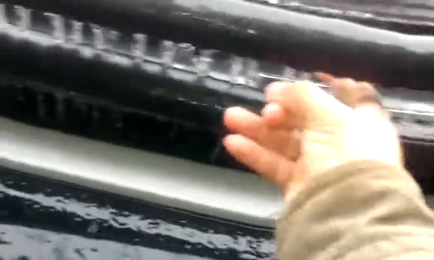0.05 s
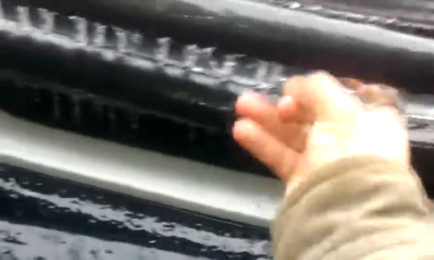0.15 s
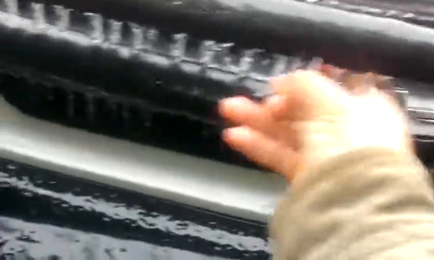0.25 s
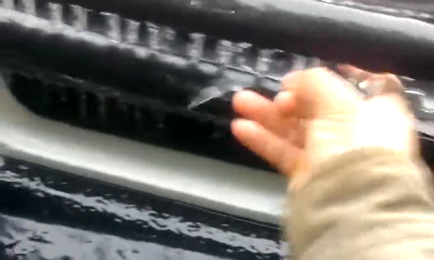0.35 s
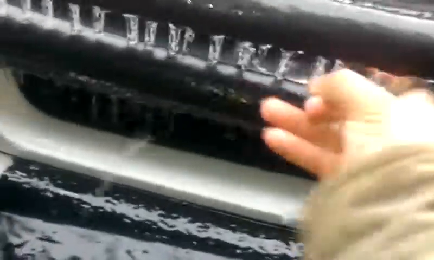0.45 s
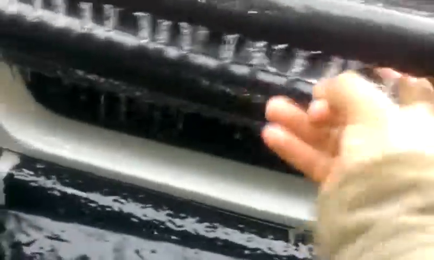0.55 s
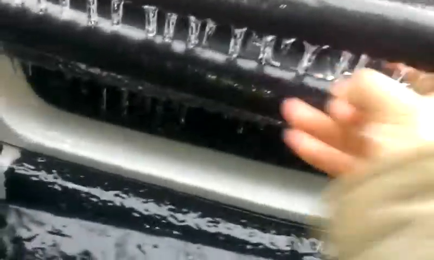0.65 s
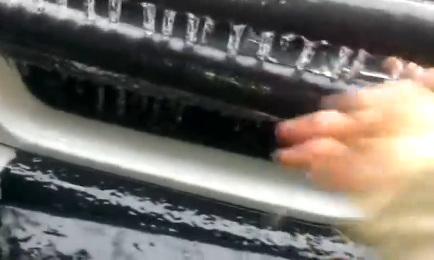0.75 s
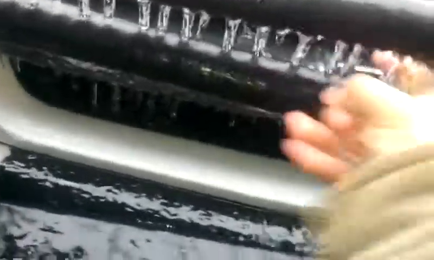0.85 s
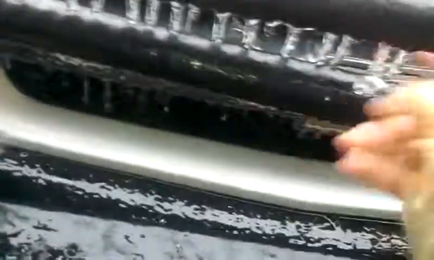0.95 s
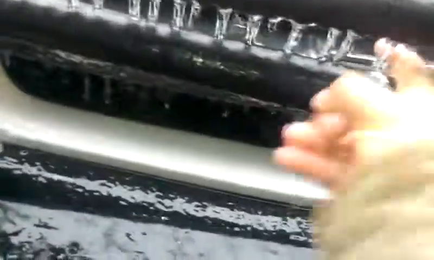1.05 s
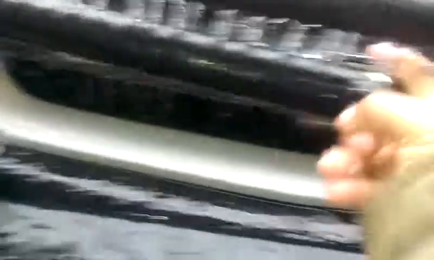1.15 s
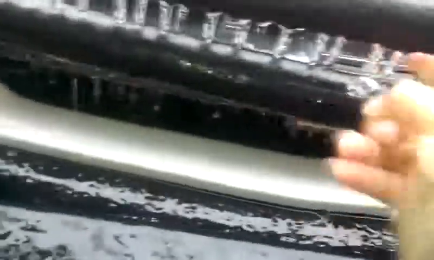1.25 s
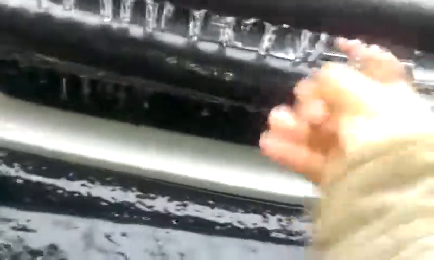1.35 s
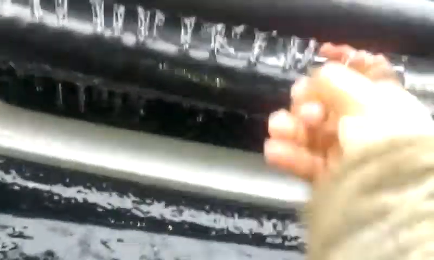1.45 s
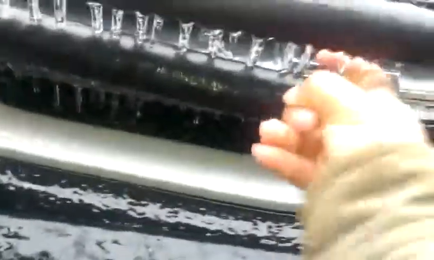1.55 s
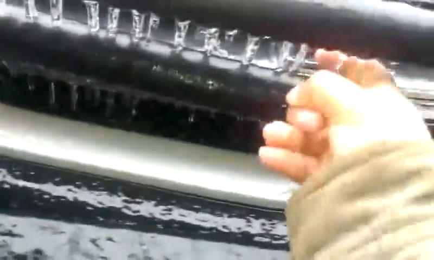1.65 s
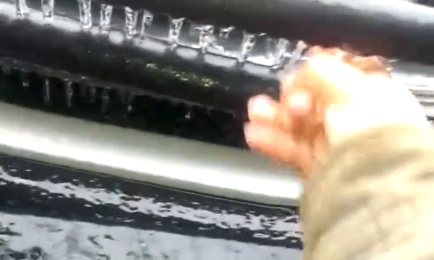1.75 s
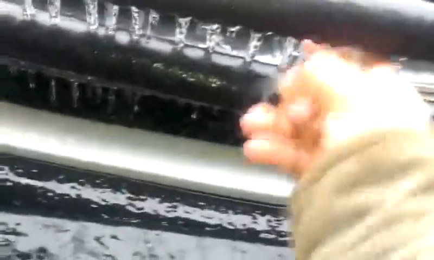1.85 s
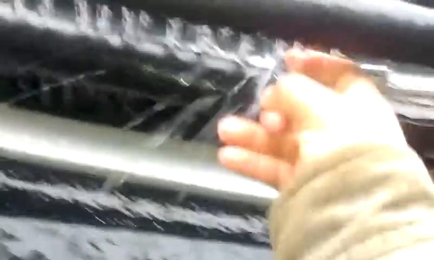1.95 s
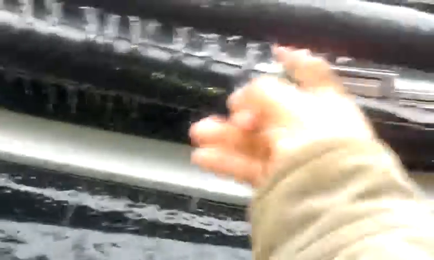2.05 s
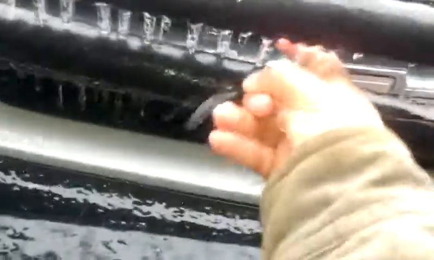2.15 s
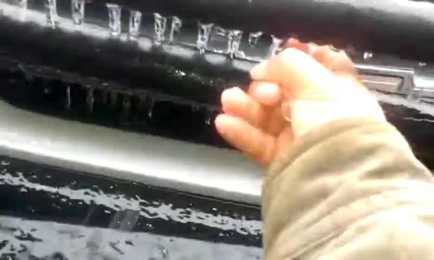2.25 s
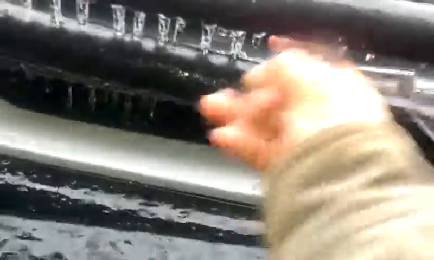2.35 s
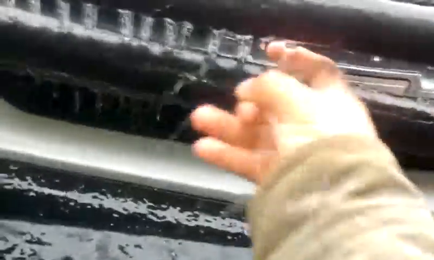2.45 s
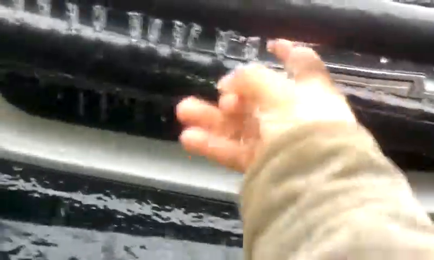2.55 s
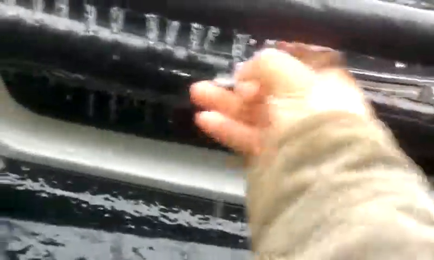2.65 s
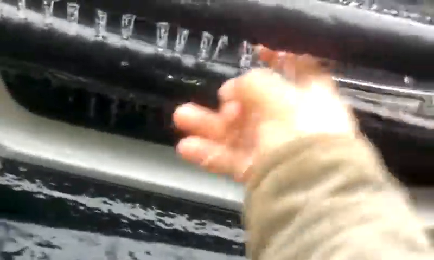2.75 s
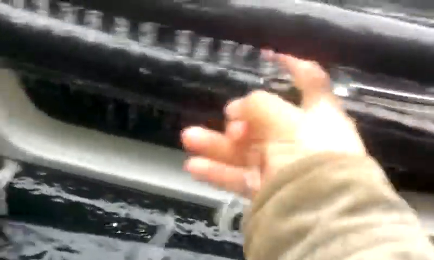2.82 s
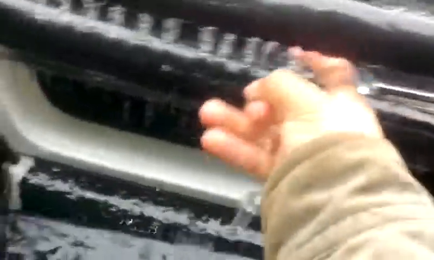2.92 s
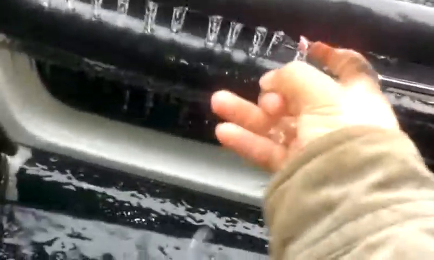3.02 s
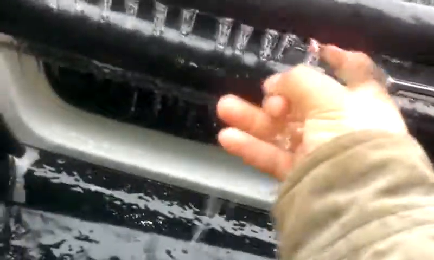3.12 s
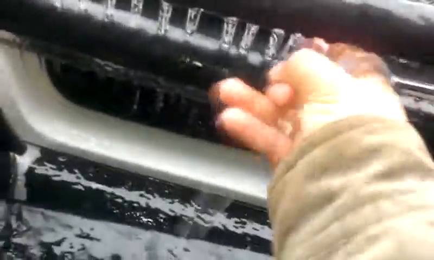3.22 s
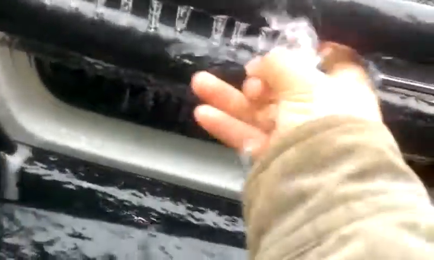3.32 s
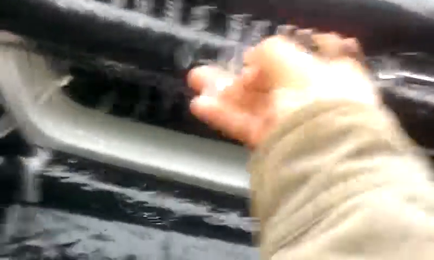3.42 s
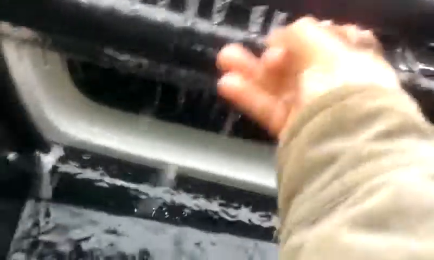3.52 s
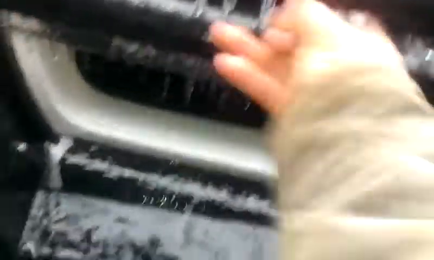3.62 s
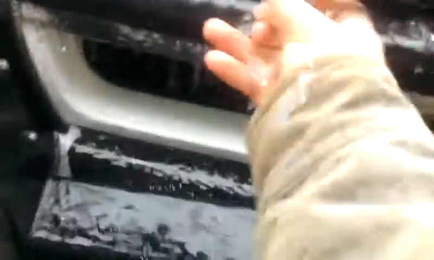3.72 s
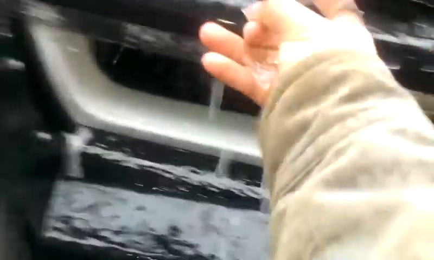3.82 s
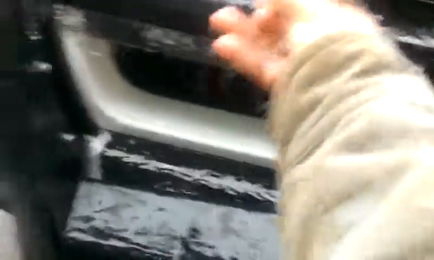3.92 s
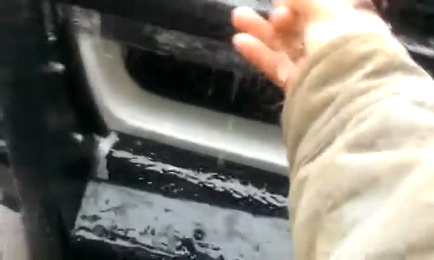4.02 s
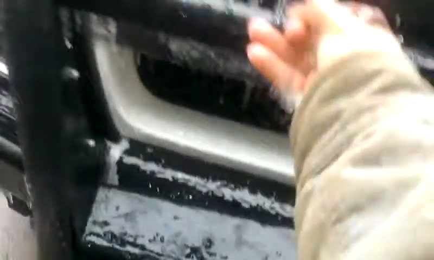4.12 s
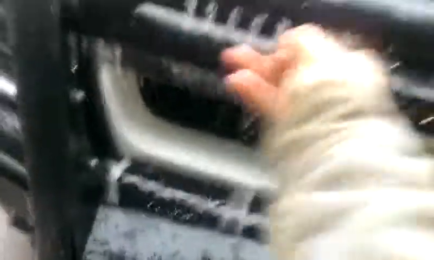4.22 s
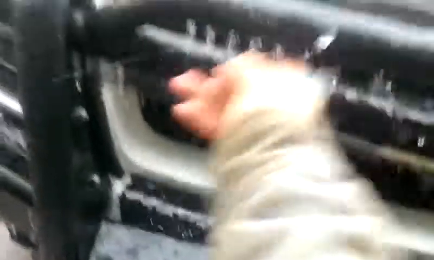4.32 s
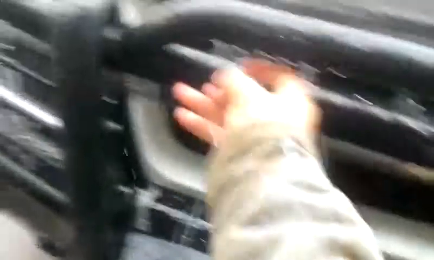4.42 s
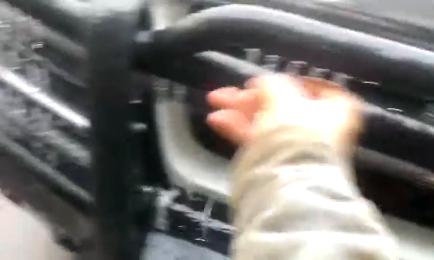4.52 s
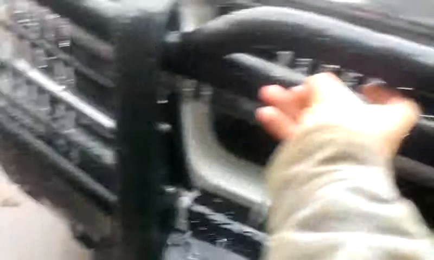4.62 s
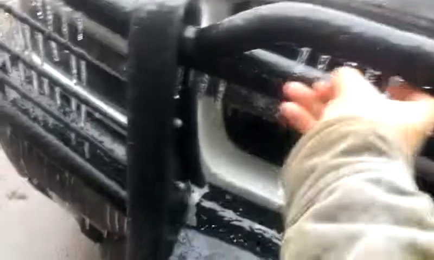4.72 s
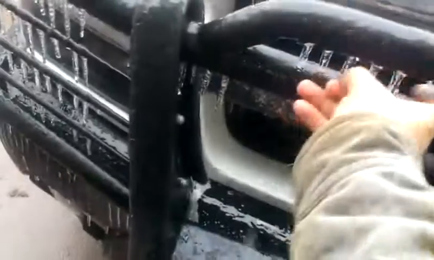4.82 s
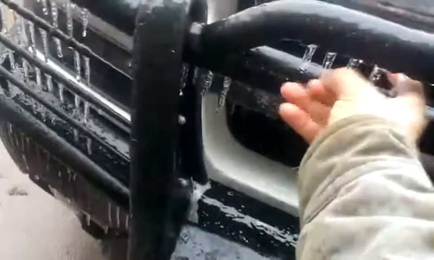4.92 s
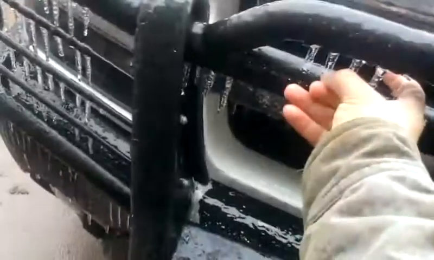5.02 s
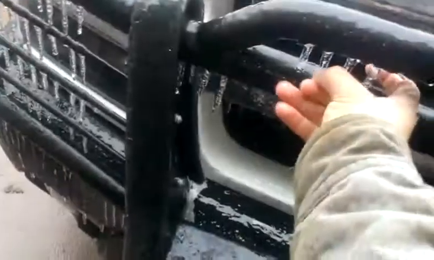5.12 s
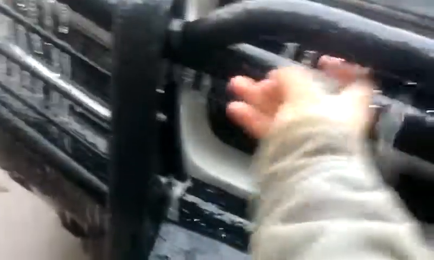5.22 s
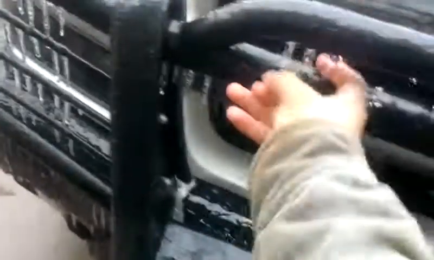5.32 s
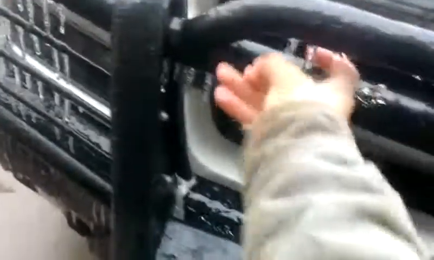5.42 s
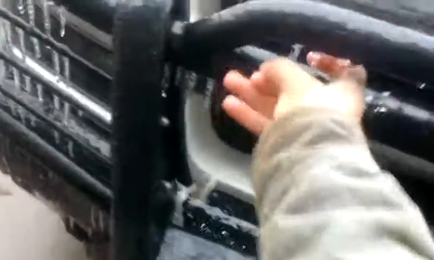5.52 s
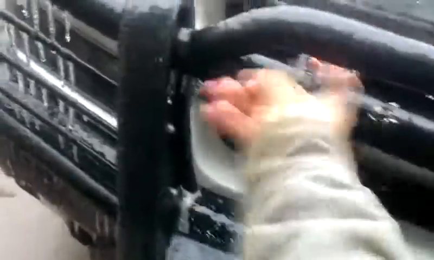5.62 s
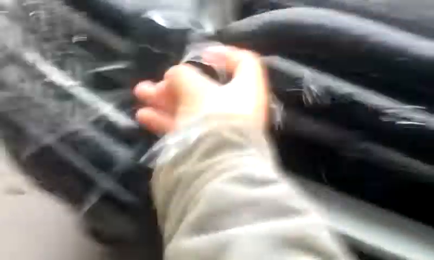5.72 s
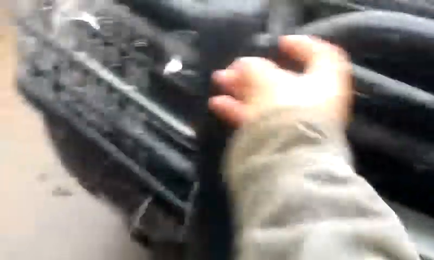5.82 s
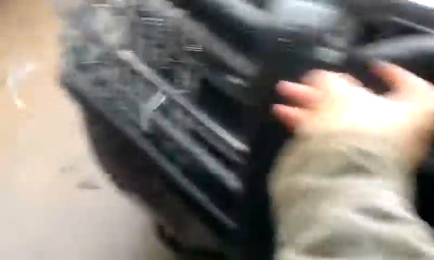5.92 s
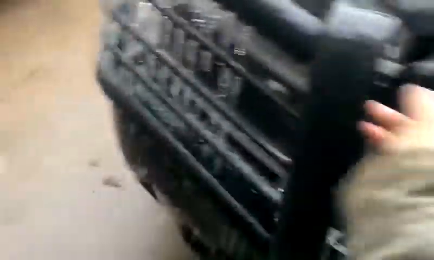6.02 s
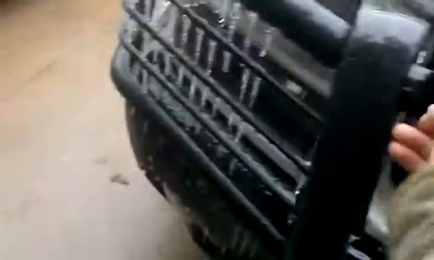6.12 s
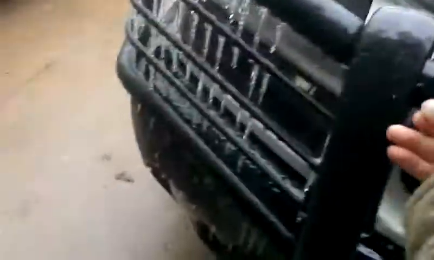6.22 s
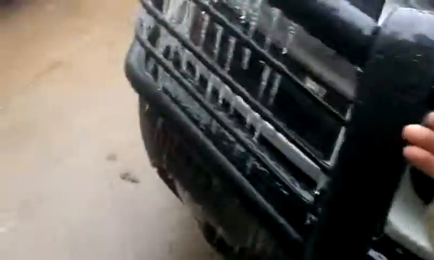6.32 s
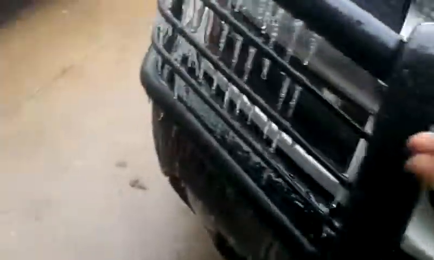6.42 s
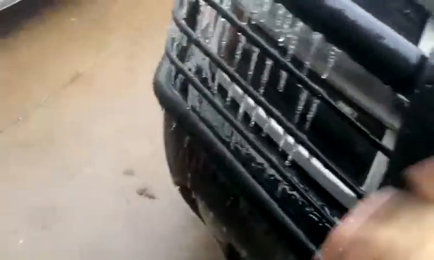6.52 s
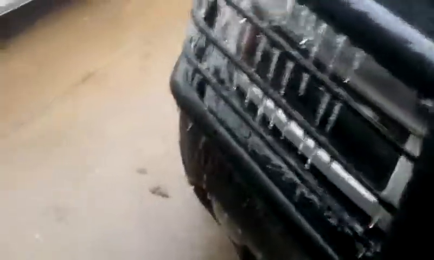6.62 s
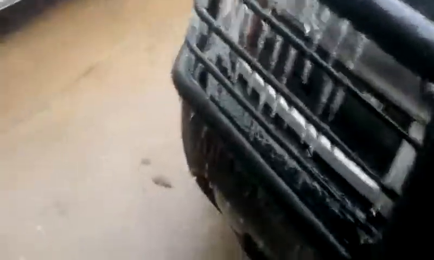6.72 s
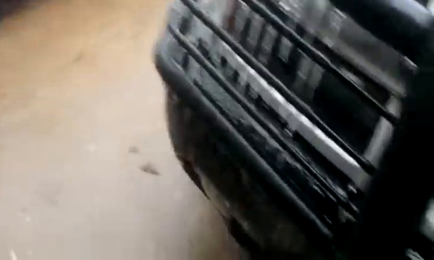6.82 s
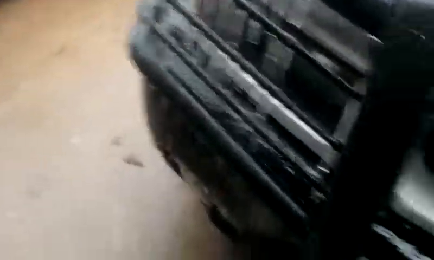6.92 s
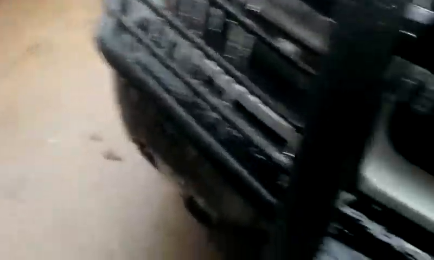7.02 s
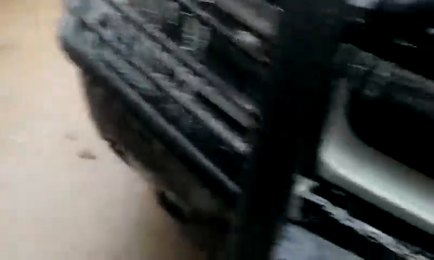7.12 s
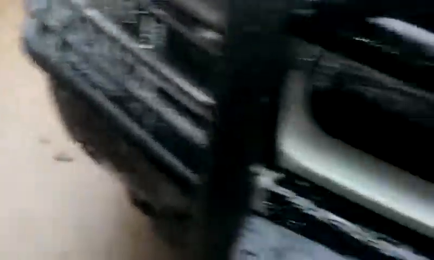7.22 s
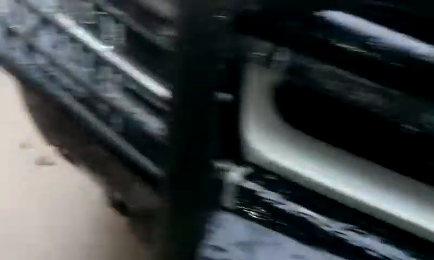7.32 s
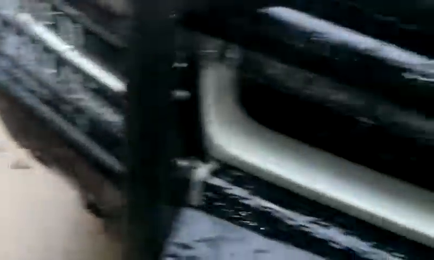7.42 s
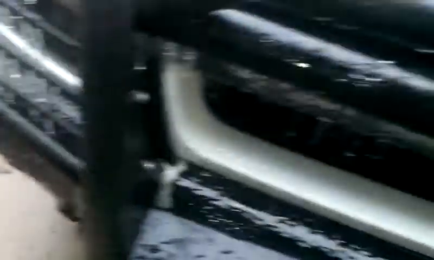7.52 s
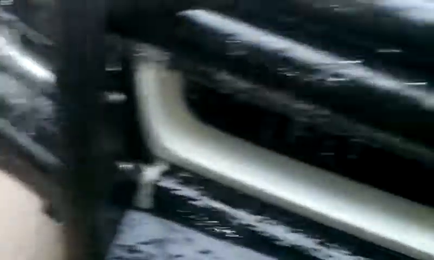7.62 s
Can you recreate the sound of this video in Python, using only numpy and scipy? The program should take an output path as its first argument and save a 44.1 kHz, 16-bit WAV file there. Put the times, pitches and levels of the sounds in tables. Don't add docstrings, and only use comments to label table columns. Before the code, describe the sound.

Close, crisp ice breaking in irregular bursts, knocking hollow bars and scattering glassy bits, then quiet cold air and a faint passing vehicle.

```python
import sys
import numpy as np
from scipy import signal
from scipy.io import wavfile
from scipy.ndimage import uniform_filter1d

SR = 44100
rng = np.random.default_rng(int(sys.argv[2]) if len(sys.argv) > 2 else 0)


def to_linear_factor(level_db):
    exponent = np.asarray(level_db, float) / 20
    return 10 ** exponent


def digitize_waveform(pressure):
    field = np.atleast_2d(pressure).T
    bounded = np.clip(field, -1, 1)
    quanta = np.round(bounded * 32767).astype(np.int16)
    wavfile.write(sys.argv[1], SR, quanta)


N = 337801
HZ = np.fft.rfftfreq(4096, 1 / SR)
LEFT_LAG = 14
RISE_S = 0.003
LEAD_IN_S = 0.006

# start in seconds, level in dB, left minus right in dB.
SHARD_FALL = [(0.0, -54.5, -0.5), (0.51, -61, 0), (0.62, -63.5, 1), (0.81, -56, 1.5), (1.36, -75.5, 2),
              (2.15, -66, -2.5), (2.4, -85, -1.5), (2.6, -59.5, -1), (3.07, -69, 0), (3.24, -60.5, 1),
              (3.41, -66.5, 2.5), (3.71, -59, 0), (4.05, -63, 0), (4.59, -68, 1.5), (4.78, -62.5, -1),
              (5.08, -63.5, -2), (5.74, -58.5, 0), (6.06, -67.5, 0.5)]
# frequency in Hz, level in dB.
ICE_TONE = [(300, -7.5), (900, -1), (2300, 5.5), (3300, 3.5), (4200, 5.5), (7000, -2), (10300, -13),
            (11000, -23)]


def evened(x):
    return x / np.sqrt(np.mean(np.square(x)) + 1e-20)


def read(points, hz):
    f, value = np.transpose(points)
    return np.interp(np.log(hz + 1), np.log(f + 1), value)


def curves(rows):
    s, *columns = np.transpose(rows)
    return [np.interp(np.arange(N) / SR, s, c) for c in columns]


def add(mix, s, sound):
    part = mix[:, max(round(s * SR), 0):][:, :sound.shape[1]]
    part += sound[:, :part.shape[1]]


def colour(x, db):
    both_sides_db = np.r_[db, db[-2:0:-1]]
    log_gain = np.log(to_linear_factor(np.maximum(both_sides_db, -100)))
    taps = np.fft.ifft(np.exp(np.conj(signal.hilbert(log_gain)))).real[:1024]
    return signal.oaconvolve(x, taps[None], axes=1)[:, :x.shape[1]]


def resonate(x, hz, t60):
    r = to_linear_factor(-60 / (t60 * SR))
    turn = 2 * np.pi * hz / SR
    return signal.lfilter([0, np.sin(turn)], [1, -2 * r * np.cos(turn), r * r], x)


def wash():
    # frequency in Hz, level in dB per Hz.
    wash_tone = [(15, -45), (43, -3), (131, -3.5), (344, -11), (759, -9.5), (5970, -26), (7510, -39.5),
                 (11000, -48)]
    # frequency in Hz, left-right likeness from -1 to 1.
    likeness = [(60, 0.85), (170, 0.97), (490, 0.23), (1390, 0.039), (3960, -0.14), (11300, -0.73)]
    # time in seconds, level in dB.
    swell = [
        (0, 1),
        (1.4, -5),
        (2.2, -3.5),
        (4, -2),
        (6, -2.5),
        (6.2, -5),
        (6.7, -1),
        (7.66, -3),
    ]
    frames, hz = N // 256 + 5, np.fft.rfftfreq(1024, 1 / SR)
    a, b, c, d, patches = rng.standard_normal((frames, 513, 5)).T
    patches = evened(uniform_filter1d(uniform_filter1d(patches, 12, 0), 14, 1))
    same = np.clip(read(likeness, hz), -1, 1)[:, None]
    left = a + 1j * b
    right = same * left + np.sqrt(1 - same ** 2) * (c + 1j * d)
    z = np.array([left, right]) * to_linear_factor(read(wash_tone, hz)[:, None] + 1.64 * patches)
    noise = signal.istft(z, nperseg=1024, noverlap=768)[1][:, :N]
    return to_linear_factor(-57 + curves(swell)[0]) * evened(noise)


def skitter():
    after_last = np.maximum(np.arange(N) / SR - SHARD_FALL[-1][0], 0)
    level_db = curves(SHARD_FALL)[0] - 17.5 * after_last
    clumps = to_linear_factor(2.04 * evened(uniform_filter1d(rng.standard_normal(N), 600)))
    hits = rng.random(N) < 400 / SR
    size = to_linear_factor(10.0 * np.minimum(rng.exponential(1, N), 2)) * hits
    pitches = np.geomspace(1955, 7500, num=20)
    which = rng.integers(0, len(pitches), N)
    chimes = sum(resonate(size * (which == k), hz, 0.05) for k, hz in enumerate(pitches))
    chimes = np.array([np.roll(chimes, LEFT_LAG), chimes])
    dust = colour(rng.standard_normal((2, N)), read(ICE_TONE, HZ))
    crumbs = to_linear_factor(3 * rng.standard_normal(N)) * (rng.random(N) < 40 / SR)
    dust = dust * (1 + 1.5 * signal.lfilter([1], [1, -0.98], crumbs))
    return to_linear_factor(level_db) * clumps * (0.21 * evened(chimes) + 0.81 * evened(dust))


def swarm(hz, crumble, t):
    noise, luck = rng.standard_normal((3, len(t))), rng.random((9, 3))
    cracks = to_linear_factor(2.35 * np.minimum(rng.exponential(1, len(t)), 2.5))
    cracks = cracks * (rng.random(len(t)) < 1400 / SR)
    cracks[40 + round(LEAD_IN_S * SR)] = 3.7
    lead_in = to_linear_factor(-22) * np.minimum(t / LEAD_IN_S, 1) ** 2
    t = np.maximum(t - LEAD_IN_S, 0)
    fade = np.clip(t / RISE_S, lead_in, 1) * np.exp(-(t / max(crumble, 0.002)) ** 0.94)
    puffs = signal.lfilter([1], [1, -0.97], cracks) + 1.15
    splinters = (0.39 * noise[0] + 0.81 * noise[1:]) * puffs * fade
    strikes = cracks * fade * np.sign(noise[0])
    ring_s = 0.007
    early = strikes * np.exp(-t / 0.006)
    partials = resonate(early, hz, ring_s) * (0.29 + 0.091 * luck[0, :2, None])
    for left, right, pitch in luck[1:]:
        own = strikes * (rng.random(len(t)) < 0.25)
        partials += 0.22 * resonate(own, 1800 * 4.5 ** pitch, ring_s) * [[left], [right]]
    both = np.array([splinters, partials])
    lag = int(LEFT_LAG * (0.2 + 0.5 * luck[0, 2]))
    both[:, 0] = np.roll(both[:, 0], lag, axis=1)
    return both * np.sqrt(np.mean(fade ** 2) / np.mean(both ** 2, axis=(1, 2), keepdims=True))


def bars(blows):
    # frequency in Hz, level in dB, time to fade by 60 dB in seconds.
    iced_bar = [(2830, -37, 0.13), (2620, -44, .08), (7860, -38, 0.05), (3960, -38, 0.046),
                (6200, -44, 0.075)]
    # frequency in Hz, level in dB, time to fade by 60 dB in seconds.
    corner_rails = [(1720, -39, .13), (2392, -37, .12), (3140, -38, .1), (3702, -39, .1)]
    t = np.arange(N) / SR
    shaken = 0.0035 * np.tanh(blows / 0.0045)
    near_bar = np.interp(t, [0, 1.2, 1.9, 4.2, 4.6], [0.052, 0.07, 0.41, 1.0, 0.19])
    at_corner = abs(t - 5.3) < 0.69
    ringing = sum(to_linear_factor(db) * resonate(shaken * near_bar, hz, t60) for hz, db, t60 in iced_bar)
    return ringing + sum(to_linear_factor(db) * resonate(shaken * at_corner, hz, t60) for hz, db, t60 in corner_rails)


def breaks():
    # start in seconds, peak in dB, ice ring in Hz, crumble time in seconds.
    snaps = [(0.2779, -14, 2440, 0.0044), (0.4325, -36.5, 3010, 0.0054), (0.5566, -29, 1820, 0.007),
             (0.9807, -37, 1580, 0.025), (1.139, -42.5, 1430, 0.0081), (1.152, -50, 4400, 0.021),
             (1.2148, -41.5, 3160, 0.018), (1.2241, -41.5, 3050, 0.028), (1.914, -21, 2600, 0.0068),
             (2.385, -54.5, 1520, 0.026), (2.4225, -27, 2710, 0.011), (2.4295, -27, 4000, 0.0056),
             (2.4405, -31, 2600, 0.0062), (2.4575, -37, 4030, 0.0054), (2.7069, -46.5, 2320, 0.039),
             (2.7381, -22, 3830, 0.0043), (2.808, -32.5, 3950, 0.014), (2.8387, -33, 2800, 0.0051),
             (2.9624, -48, 2660, 0.0098), (3.1926, -45, 6300, 0.014), (3.249, -32.5, 2730, 0.0057),
             (3.356, -23, 3980, 0.0037), (3.8711, -39.5, 2640, 0.0077), (4.3203, -16.5, 2120, 0.0056),
             (4.581, -33, 4200, 0.018), (4.5965, -40, 2400, 0.011), (4.6075, -29.5, 3970, 0.01),
             (4.6425, -36, 5000, 0.0054), (4.6702, -37.5, 3900, 0.014), (4.809, -37, 4900, 0.0083),
             (4.856, -48.5, 2460, 0.012), (4.9774, -37.5, 4500, 0.0048), (5.2118, -38.5, 4900, 0.0048),
             (5.6279, -21.5, 6180, 0.0064), (5.9205, -44, 4740, 0.0091), (5.96, -48, 5840, 0.008),
             (6.0034, -45, 6200, 0.012), (6.3445, -44, 4420, 0.01)]
    knocks = [(0.6433, -41, 2700, 0.027), (0.701, -34, 4130, 0.0065), (1.4684, -54.5, 2030, 0.0095),
              (1.6597, -45, 4020, 0.0052), (1.9751, -48, 3100, 0.015), (2.0425, -42, 2930, 0.0054),
              (2.212, -46.5, 4800, 0.011), (2.4065, -24, 3880, 0.011), (2.5012, -44.5, 2990, 0.019),
              (3.1251, -36.5, 2400, 0.011), (3.2136, -39.5, 3940, 0.0094), (3.2957, -36.5, 4180, 0.0071),
              (3.3281, -18.5, 1910, 0.0063), (3.557, -36, 3100, 0.005), (3.679, -27.5, 2810, 0.011),
              (3.7177, -15.5, 2100, 0.0057), (3.783, -41, 3000, 0.018), (3.928, -45, 6100, 0.0091),
              (3.9926, -49, 3940, .0071), (4.2841, -34, 1740, 0.018), (4.3438, -23, 2020, 0.0045),
              (5.2488, -28, 2180, 0.01), (5.706, -44, 6030, 0.023), (5.714, -42, 4200, 0.043),
              (5.7295, -24.5, 3530, 0.014), (6.416, -48.5, 1900, 0.013)]
    crunches = [(0.0625, -28.5, 4240, 0.0061), (0.0988, -40.5, 1580, 0.0074), (0.1156, -39, 1000, 0.0054),
                (0.1762, -21.5, 1670, 0.019), (0.212, -18.5, 3000, 0.0085), (0.3335, -32.5, 1570, 0.014),
                (0.7657, -45, 1780, 0.027), (0.845, -28, 1600, 0.0046), (0.8906, -17.5, 1220, 0.012),
                (2.5842, -46, 2530, .006), (2.611, -60, 2870, 0.036), (3.6413, -44, 3040, 0.026),
                (4.0152, -34.5, 3940, 0.0051), (4.051, -33.5, 2540, 0.0062), (4.1101, -31.5, 2220, 0.017),
                (4.177, -38.5, 6200, 0.017), (5.4222, -27.5, 2000, 0.0099), (5.526, -22, 2620, 0.011),
                (5.881, -34.5, 980, 0.0097)]
    clinks = [
        (0.2633, -29, 2560, .015),
        (0.7882, -29.5, 1750, 0.015),
        (4.5042, -41.5, 2860, 0.011),
        (4.613, -33, 2470, 0.016),
        (4.6905, -25, 4400, 0.018),
        (4.7686, -45, 2530, 0.026),
        (4.929, -46.5, 2580, 0.011),
        (5.5024, -41, 3880, 0.024),
        (5.9203, -47, 1760, 0.015),
    ]
    glaze = [(0.494, -38, 2900, 0.005), (0.5438, -45.5, 2920, 0.012), (1.2633, -42.5, 4140, 0.0064),
             (1.5567, -54, 5900, 0.032), (2.1241, -54, 5900, 0.022), (2.555, -54, 7100, .004),
             (2.68, -58, 7500, 0.0036), (2.8685, -44, 7800, 0.0063), (3.043, -55.5, 1830, 0.046),
             (3.0648, -30.5, 2420, 0.0089), (3.4245, -28.5, 6160, 0.0064), (3.5965, -54, 4310, .003),
             (3.615, -44, 1850, 0.004), (5.044, -51, 6200, 0.0064), (5.1024, -42.5, 5800, 0.0077),
             (5.3144, -44, 2580, 0.0047), (5.3905, -47, 6100, 0.0049), (5.406, -48, 6000, .003),
             (5.44, -45, 6940, 0.0036), (5.609, -42, 6500, 0.0039), (5.882, -51, 6100, .006),
             (5.9545, -45, 5460, 0.0034), (6.102, -45, 6200, 0.0042), (6.2891, -45.5, 5500, 0.0079)]
    resnaps = [(0.2524, -36, 2350, 0.023), (0.2896, -25, 6640, 0.0077), (0.2995, -25, 4500, 0.013),
               (2.4485, -35, 2600, 0.017), (2.7881, -46, 2580, 0.0066), (3.0745, -28.5, 3930, 0.0064),
               (3.091, -33.5, 6400, 0.015), (3.5354, -51, 3030, 0.0099), (3.7084, -33, 2400, 0.012),
               (4.078, -52, 3040, 0.009), (4.6515, -38.5, 2270, 0.0089), (4.7067, -32, 2510, .008),
               (4.7117, -34, 5900, 0.008), (5.7664, -27.5, 5960, 0.0044), (6.748, -56.5, 2320, 0.016)]
    recrunches = [(0.1842, -25, 1880, 0.0045), (0.1904, -19.5, 880, 0.0065), (0.2204, -25, 840, 0.0039),
                  (0.8834, -24, 4470, 0.0088), (0.8974, -17, 1170, 0.0076), (3.444, -32, 2950, 0.0037),
                  (5.2778, -35, 2120, 0.0071), (5.3487, -47.5, 1600, 0.076)]
    # the breaks, brittle top in dB, hollow body in dB.
    kinds = [(snaps, -11, -42), (knocks, -10.5, -2.5), (crunches, -20.5, -1.5), (clinks, -25, -60.5),
             (glaze, -6, 1), (resnaps, -10, -15), (recrunches, -26.5, -0.064)]
    body, top, hollow = np.zeros((3, 2, N))
    t = np.arange(3000) / SR
    for rows, top_db, hollow_db in kinds:
        for s, db, hz, crumble in rows:
            splinters, partials = swarm(hz, crumble, t)
            s -= LEAD_IN_S
            add(body, s, to_linear_factor(db - 7.5) * (splinters + 0.52 * partials))
            add(top, s, to_linear_factor(db + top_db + 9.5) * (splinters + 0.96 * partials))
            add(hollow, s, to_linear_factor(db + hollow_db + 0.5) * (0.5 * splinters + 0.5 * splinters[::-1]))
    crack_db = read(ICE_TONE, HZ)
    low_half = -20 * np.log10(1 + (HZ / 6000) ** 4)
    high_half = -20 * np.log10(1 + (5000 / (HZ + 1)) ** 4)
    hollow_band = -20 * np.log10(1 + (HZ / 1400) ** 4) - 20 * np.log10(1 + (600 / (HZ + 1)) ** 3)
    ice = colour(body, crack_db + low_half) + colour(top, crack_db + high_half)
    return ice + colour(hollow, hollow_band) + bars(body + top)


def chips():
    # start in seconds, peak in dB, centre in Hz.
    sharp_chips = [(0.0646, -44, 2760), (0.144, -50, 1580), (0.177, -24, 2000), (0.2217, -24, 1690),
                   (0.3065, -26, 5700), (0.2778, -14, 2380), (0.292, -17, 6550), (0.4354, -35.5, 3000),
                   (0.4976, -37, 8300), (0.702, -38, 6400), (0.7453, -50, 2200), (0.7797, -32.5, 1820),
                   (0.892, -40, 3750), (0.902, -38, 2040), (0.9821, -43, 4130), (1.265, -37, 6340),
                   (1.9169, -19, 2300), (2.429, -29.5, 2230), (2.7388, -33, 7800), (2.809, -28, 8000),
                   (2.8158, -32, 6460), (2.8396, -34, 5500), (2.9165, -45, 6700), (2.9734, -51, 2110),
                   (3.0734, -25.5, 6130), (3.093, -26.5, 6500), (3.129, -47, 1810), (3.3293, -19, 6680),
                   (3.3565, -28, 1810), (3.3618, -30, 4000), (3.4278, -26, 4010), (3.4455, -33, 2950),
                   (3.5979, -46, 5680), (3.6164, -46, 1980), (3.6793, -28, 2620), (3.715, -24, 6760),
                  (3.7194, -22, 2170), (4.2864, -31, 2230), (4.3204, -19.5, 2080), (4.324, -14.5, 4170),
                  (4.3463, -22.5, 2300), (4.583, -21, 4300), (4.608, -23.5, 5450), (4.6707, -36, 7400),
                  (4.6955, -26, 2290), (4.6985, -38, 2260), (4.8106, -35, 5600), (5.045, -36.5, 6800),
                  (5.05, -42, 7100), (5.107, -47, 5810), (5.25, -53, 2270), (5.2797, -34, 6500),
                  (5.3337, -45, 6070), (5.3505, -39, 5700), (5.4065, -43, 7000), (5.5257, -21, 2590),
                  (5.5923, -44, 1700), (5.6304, -38, 6000), (5.7302, -14, 5670), (5.7681, -44, 5380),
                  (5.886, -42, 6100), (5.926, -59, 1800), (6.346, -32, 4340)]
    out, t = np.zeros((2, N)), np.arange(500) / SR
    for s, db, hz in sharp_chips:
        spray = 0.27 * np.diff(rng.standard_normal((2, len(t))), prepend=0)
        u = t * np.sqrt(hz * 2500) / 1.38
        tick = (np.sin(2 * np.pi * hz * t) + spray) * u * np.exp(1 - u)
        tick[0] = np.roll(tick[0], LEFT_LAG // 3)
        add(out, s - 0.0004, to_linear_factor(db - 5) * tick)
    return out


def thuds():
    # start in seconds, peak in dB, centre in Hz, length in seconds.
    thumps = [(0.113, -37.5, 905, 0.0081), (0.899, -35, 910, 0.0079), (1.582, -52, 120, 0.016),
              (1.928, -45, 118, 0.06), (2.411, -33.5, 420, 0.021), (2.439, -37, 323, 0.024),
              (2.814, -39.5, 364, 0.011), (2.841, -44, 290, 0.018), (3.073, -52.5, 537, 0.032),
              (3.33, -36.5, 435, 0.017), (3.359, -46, 343, 0.03), (3.639, -38, 536, 0.011),
              (3.649, -39, 286, 0.04), (3.686, -42, 454, 0.041), (3.714, -40, 204, 0.034),
              (4.325, -36.5, 312, 0.028), (4.349, -40, 205, 0.027), (5.258, -43.5, 288, 0.044),
              (5.88, -41, 965, 0.0094), (5.742, -39.5, 335, 0.034)]
    out, t = np.zeros((2, N)), np.arange(5000) / SR
    for s, db, hz, length in thumps:
        envelope = np.minimum(t / 0.0025, 1) * np.exp(-t / max(length, 0.004))
        push = rng.standard_normal((3, len(t))) * envelope
        rattle = resonate(push[0] + 0.57 * push[1:], hz, 0.017)
        rattle = resonate(rattle, hz * 1.93, 0.0009)
        rattle = np.diff(rattle, prepend=0)
        add(out, s, to_linear_factor(db) * rattle / abs(rattle).max())
    return out


def rings():
    # start in seconds, peak in dB, frequency in Hz, time to fade by 60 dB in seconds.
    ringing_pieces = [(0.2784, -30, 2400, 0.026), (.494, -55, 7850, 0.064), (0.799, -47, 2424, 0.15),
                      (1.226, -47, 2910, .09), (1.224, -58, 8100, 0.099), (1.3, -68, 2813, 0.23),
                      (1.93, -63, 2800, .6), (2.043, -63, 7700, 0.071), (2.18, -69, 2840, 0.34),
                      (2.43, -36, 7940, 0.056), (2.43, -31, 4030, 0.059), (2.46, -56, 2830, 0.3),
                      (2.583, -43, 2570, 0.041), (2.6, -65.5, 2820, 0.93), (2.738, -46, 7895, 0.051),
                      (2.742, -36, 3950, 0.03), (2.868, -48, 2813, 0.064), (3.126, -44, 1660, 0.066),
                      (3.126, -49, 2383, .1), (3.128, -58, 3200, .09), (3.214, -60, 5368, 0.12),
                      (3.214, -70, 3129, 0.18), (3.213, -61, 3970, 0.11), (3.329, -38, 7840, 0.061),
                      (3.328, -41.5, 2910, 0.12), (3.429, -32, 4010, 0.04), (2.809, -50, 7840, .05),
                      (3.784, -48, 2860, 0.13), (4.178, -53, 6150, 0.11), (4.321, -38, 2836, 0.13),
                      (4.587, -45, 3890, 0.11), (4.607, -54, 2420, 0.11), (4.613, -54, 3140, 0.18),
                      (4.694, -36.5, 2400, 0.11), (4.7, -62, 3100, .11), (4.712, -53, 3710, .09),
                      (4.81, -49, 5820, 0.063), (4.812, -55, 3690, .11), (5.252, -51, 1300, 0.17),
                      (5.629, -43, 6120, .05), (5.631, -46.5, 1706, 0.11), (5.632, -31.5, 2460, 0.049),
                      (5.634, -38, 3640, 0.059), (5.634, -42, 3900, .11), (5.733, -40.5, 4160, 0.074),
                      (5.735, -39.5, 2720, 0.093), (5.881, -56, 1710, 0.14), (5.886, -59, 3690, 0.2),
                      (5.922, -60, 1723, 0.11)]
    out, t = np.zeros((2, N)), np.arange(9000) / SR
    for s, db, hz, t60 in ringing_pieces:
        turn, split = rng.random((2, 2, 1))
        second_hz = hz * (1 + 0.038 * (split[0] - 0.5))
        pair = np.sin(2 * np.pi * (hz * t + turn)) + 1.2 * np.sin(2 * np.pi * second_hz * t)
        add(out, s, to_linear_factor(db - 60 * t / t60) * np.minimum(t / RISE_S, 1) * pair)
    return out * (0.9 + 0.3 * evened(uniform_filter1d(rng.standard_normal(N), size=120)))


def grille(x):
    t = np.arange(5000) / SR
    taps = rng.choice([-1., 1.], (2, len(t))) * (rng.random((2, len(t))) < 0.1)
    taps = taps * to_linear_factor(-60 * t / 0.15) * (t > 0.001)
    return signal.oaconvolve(x, taps / np.linalg.norm(taps[0]), axes=1)[:, :N]


def pops():
    # start in seconds, peak in dB.
    port_hits = [(0.544, -39), (0.556, -29.5), (0.6123, -38), (0.6207, -37), (0.6248, -27.5), (0.6364, -34),
                 (0.643, -36), (0.648, -44), (0.6522, -31), (0.6605, -35), (0.6643, -33.5), (0.8455, -31),
                 (0.8535, -41), (0.8564, -34.5), (0.865, -36), (0.8804, -34), (5.1958, -29.5),
                 (5.2733, -39), (5.4147, -37.5), (5.2929, -29.5), (5.3564, -28.5)]
    out, t = np.zeros((2, N)), np.arange(400) / SR - 0.0004
    for s, db in port_hits:
        back = 0.00075 * rng.uniform(0.49, 1.74)
        swing = np.exp(-(t / 0.00015) ** 2) - 0.63 * np.exp(-((t - back) / 0.00033) ** 2)
        swing += 0.16 * np.exp(-((t - 4.1 * back) / 0.00034) ** 2)
        shake = rng.standard_normal(len(t)) * np.exp(-(t / 0.0028) ** 2)
        swing += 0.032 * resonate(shake, 3150, 0.0093) / 4
        swing += 0.35 * rng.standard_normal(len(t)) * np.exp(-(t / 0.00044) ** 2)
        add(out, s - 0.0002, to_linear_factor(db + 5.5) * swing * [[1], [0]])
    return out


def hum(rows, orders):
    hz, level_db = curves(rows)
    t, out = np.arange(N) / SR, 0
    for multiple, db in orders:
        waver = evened(uniform_filter1d(uniform_filter1d(rng.standard_normal(N), 2500), 2500))
        tone = np.sin(2 * np.pi * multiple * np.cumsum(hz) / SR)
        out = out + to_linear_factor(db + 5.0 + 1.1 * multiple * waver) * tone
    to_edge = np.minimum(t - rows[0][0], rows[-1][0] + 0.13 - t)
    return to_linear_factor(level_db) * out * np.clip(to_edge / 0.023, 0, 1)


def engine():
    # time in seconds, firing rate in Hz, level in dB.
    firing = [
        (6.25, 80.4, -66.5),
        (6.46, 79.1, -62),
        (6.54, 86.1, -58),
        (6.7, 90, -60.5),
        (7.22, 96.2, -62),
        (7.32, 98, -72),
    ]
    # multiple of the firing rate, level in dB.
    firing_orders = [(1, 1), (1.37, -9), (2, -10.5), (2.8, -15), (3.8, -17.5)]
    # time in seconds, frequency in Hz, level in dB.
    exhaust = [
        (6.4, 163.3, -70),
        (6.512, 170, -60.5),
        (6.62, 172, -80),
    ]
    # time in seconds, frequency in Hz, level in dB.
    gear_drone = [
        (7.12, 260, -95),
        (7.234, 283.6, -64.5),
        (7.66, 286, -68),
    ]
    return hum(firing, firing_orders) + hum(gear_drone, [(0.98, 0.014)]) + hum(exhaust, [(1, 0.0054)])


def tyres():
    hiss = evened(resonate(rng.standard_normal((2, N)), 2400, 0.0061))
    from_peak = abs(np.arange(N) / SR - 7.15)
    return to_linear_factor(-69.5 - 17.5 * from_peak) * hiss


def scene():
    ice = skitter() + breaks() + chips() + rings()
    ice = ice + to_linear_factor(-10.5) * grille(ice)
    pan_db = curves(SHARD_FALL)[1]
    ice = ice * to_linear_factor([pan_db / 2, -pan_db / 2])
    return wash() + ice + thuds() + pops() + engine() + tyres()


def roll_off(x):
    return signal.sosfilt(signal.butter(12, 11890, fs=SR, output="sos"), x)


def record(dry):
    # frequency in Hz, left minus right in dB.
    port_lean = [(60, -2.5), (130, -0.5), (270, 1), (570, -2.5), (1200, -6.5), (2530, 1), (5340, 2),
                 (11300, -15)]
    lean_db = read(port_lean, HZ) / 2
    bass_cut_db = np.maximum(-20 * np.log10(1 + (70 / (HZ + 1)) ** 9), -14)
    cut_db = bass_cut_db - 20 * np.log10(1 + (HZ / 10560) ** 50)
    left = colour(dry[:1], cut_db + lean_db)
    right = colour(dry[1:], cut_db - lean_db)
    return roll_off(np.r_[left, right])


dry = scene()
out = record(dry)
digitize_waveform(out)
```